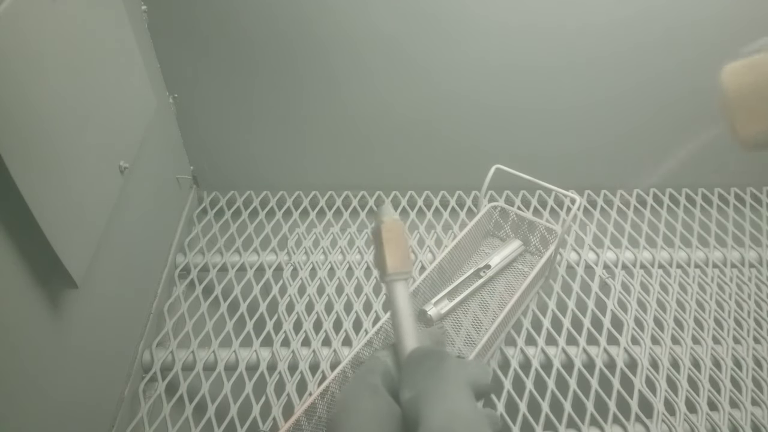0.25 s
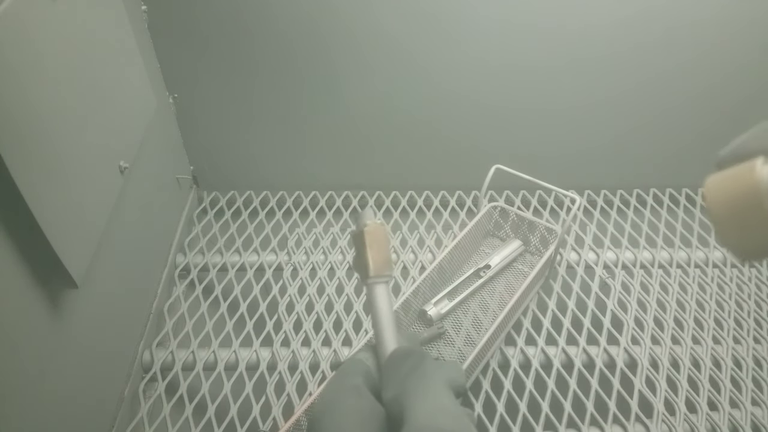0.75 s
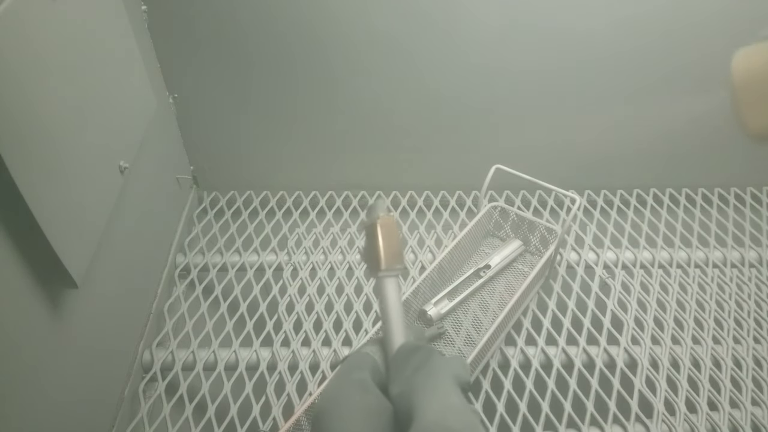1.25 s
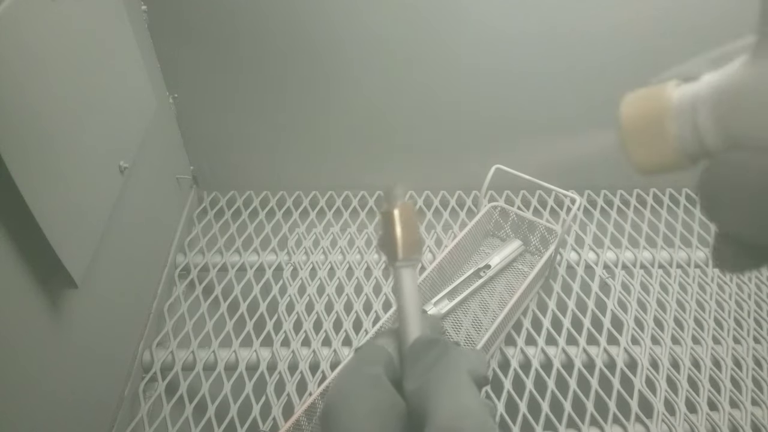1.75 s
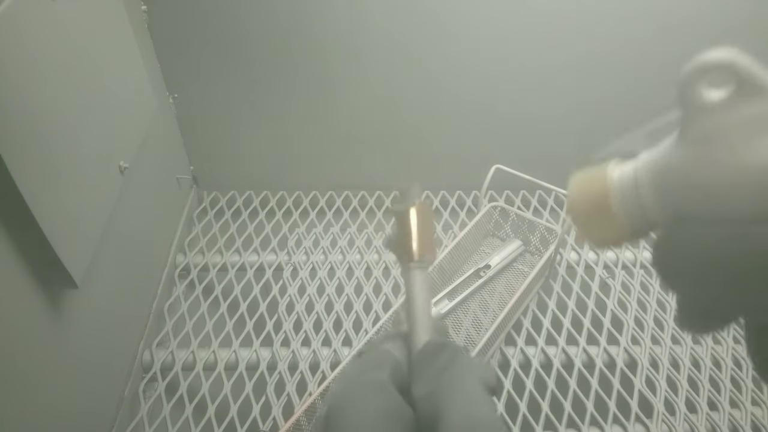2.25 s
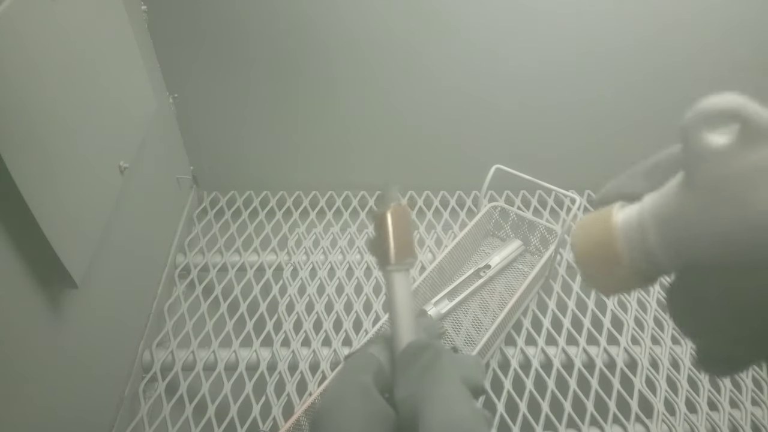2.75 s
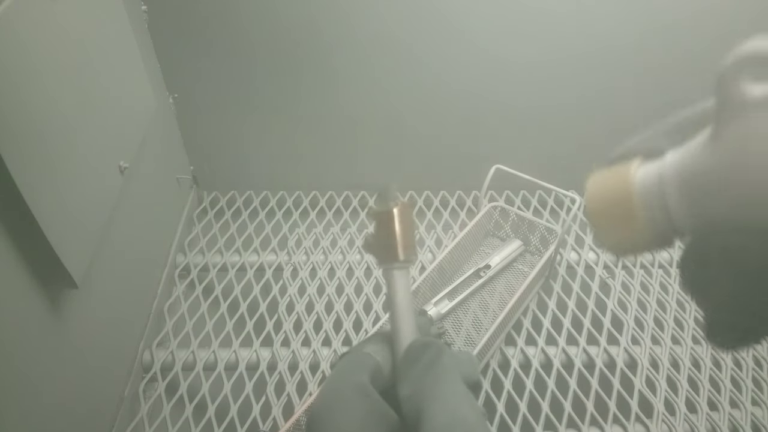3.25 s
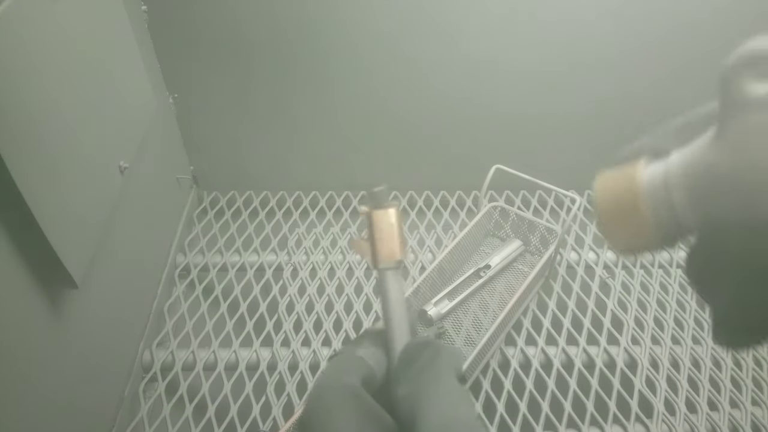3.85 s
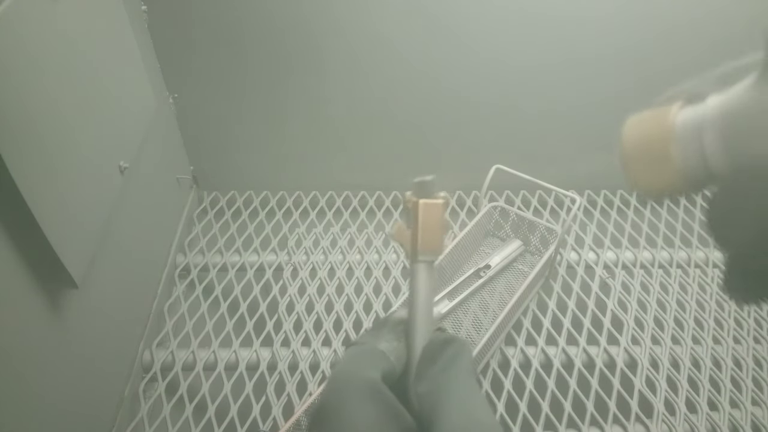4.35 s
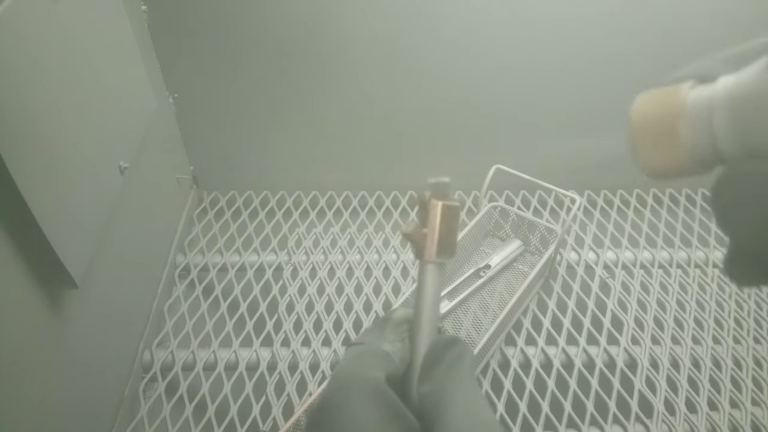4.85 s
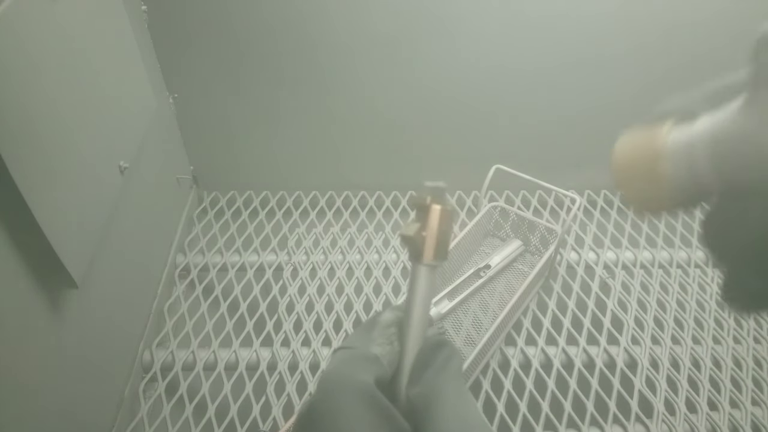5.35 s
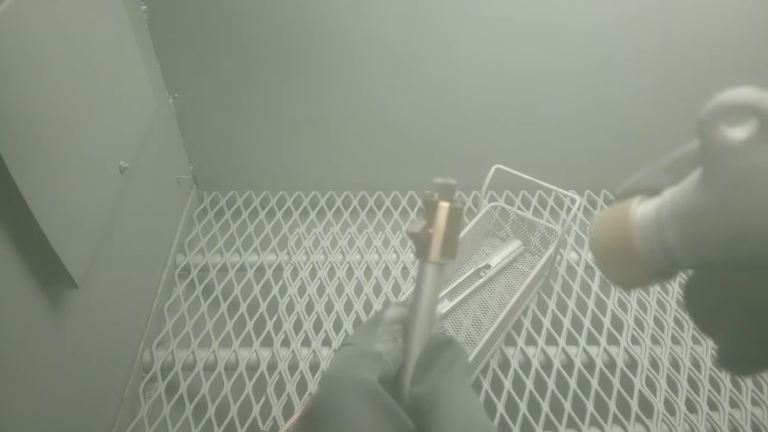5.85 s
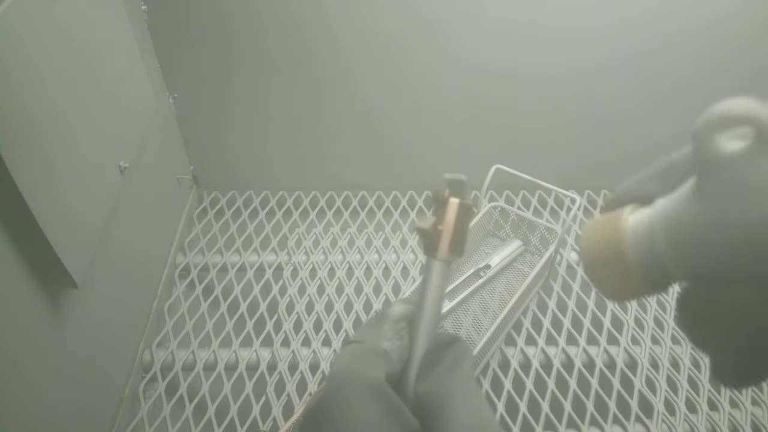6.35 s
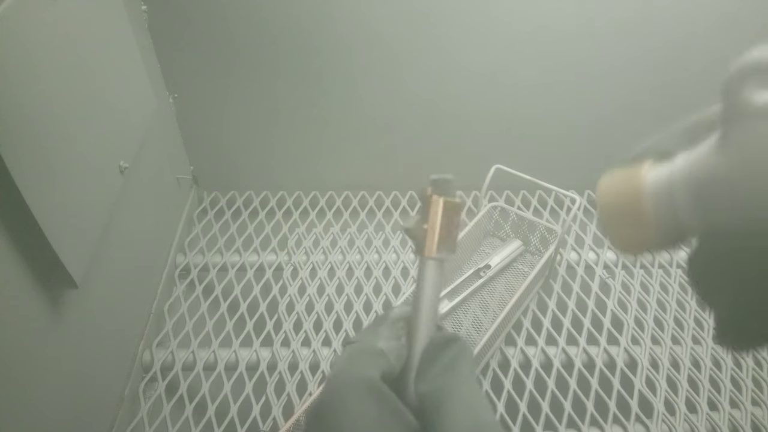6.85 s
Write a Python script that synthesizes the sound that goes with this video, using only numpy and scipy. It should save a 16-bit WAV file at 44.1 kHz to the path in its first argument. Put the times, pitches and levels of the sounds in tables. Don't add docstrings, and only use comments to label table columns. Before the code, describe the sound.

Inside a closed steel cabinet, a quiet motor hum gives way to a burst of air and a long gritty blasting hiss rattling on metal.

```python
import sys
import numpy as np
from scipy import signal
from scipy.fft import rfft, irfft, next_fast_len
from scipy.io import wavfile
from scipy.ndimage import uniform_filter1d, map_coordinates

SR = 44100
rng = np.random.default_rng(int(sys.argv[2]) if len(sys.argv) > 2 else 0)


def inscribe(sig):
    pcm = np.round(np.clip(np.atleast_2d(sig).T, -1, 1) * 32767)
    wavfile.write(sys.argv[1], SR, pcm.astype(np.int16))


def level_to_linear(level):
    exponent = np.asarray(level, float) / 20
    return 10 ** exponent


N = 313110
TIME_S = np.arange(N) / SR
HALF_SIDE = np.array([[.5], [-.5]])

# (middle [s], half length [s], grit level [dB],
# hand speed [re usual], brightness [dB])
PASSES = [(0.858, 0.12, -30, 0.8, -5.5), (1.166, 0.097, -38.5, 0.75, -2), (1.555, 0.053, -40, 1.2, -4),
          (1.742, 0.018, -36, 1.6, -2.5), (2.166, 0.049, -31, 0.27, 3), (2.42, 0.11, -39.5, 0.95, -1),
          (2.834, 0.086, -28, 0.81, -2.5), (3.31, 0.06, -31.5, 0.55, 1), (3.483, 0.04, -27.5, 0.85, -2),
          (4.096, 0.054, -26.5, 0.58, 0), (4.685, 0.095, -27, 0.76, 0), (5.103, 0.13, -34, 0.64, 1.5),
          (5.308, 0.035, -26, 1.4, 0), (5.42, 0.02, -32, 1.6, 0.5), (5.758, 0.069, -35, 1.6, 3.5),
          (5.97, 0.056, -32, 0.41, 2), (6.455, 0.02, -25.5, 1.1, 5), (6.638, 0.015, -31.5, 3.2, 4.5),
          (6.83, 0.033, -34, 0.68, 7), (7.025, 0.052, -29, 1.5, 3)]
# (time [s], level [dB])
BASS_CUT_DB = [(0, 1.5), (.75, 1), (1.0, -4), (1.35, -4), (1.6, -7.5), (1.8, -16), (1.95, -19.5),
               (2.3, -17), (2.85, -18), (3.5, -16), (7.1, -17.5)]


def gun():
    # (opens [s], jet rise [s], grit delay [s], grit rise [s])
    valve = (.711, .012, .022, .028)
    # (time [s], air jet level [dB], squareness to the part [dB])
    hand = [(.75, -20.5, 9.5), (.95, -18.5, 2.5), (1.3, -21.5, 5.5), (1.65, -26.5, -1), (1.97, -26, -4),
            (2.5, -25.5, -2), (3.2, -23.5, 1.5), (3.5, -24.5, 0.5), (3.74, -21.5, 0.5), (3.8, -24.5, -0.5),
            (4.2, -23, 2.5), (4.85, -24.5, 2.5), (5.5, -23.5, 1.5), (5.93, -25.5, 0.5), (6.11, -21.5, 4.5),
            (6.22, -24.5, 4), (6.45, -23.5, 0.5), (7.1, -26, 3.5)]
    # (time [s], left-right level [dB])
    side = [(0, 2), (.8, 2), (1.1, 0.8), (1.46, 2), (1.75, -0.5), (2.6, -0.4), (7.1, -0.5)]
    start_s, jet_rise_s, delay_s, grit_rise_s = valve
    hand_db, facing_db = curves(hand)
    side_db, = curves(side)
    grit_db = sweeps()
    surge = wobble(13)
    valve_open = opening(start_s, jet_rise_s) ** 2
    arrival = opening(start_s + delay_s, grit_rise_s) + 0.25 * valve_open
    spray_tail, puff, burst, creep = escapes()

    jet = air_jet(valve_open, hand_db, surge)
    leak = valve_leak(puff) + rush(burst + creep) + last_spray(spray_tail)
    ping = ricochet(arrival, facing_db, grit_db, surge)
    echo = cabinet(mono(ping + level_to_linear(1.5) * jet), t60_s=0.14, stays=0.1)
    air = (jet + leak + ping + level_to_linear(-5.0) * echo) * level_to_linear(side_db * HALF_SIDE)
    air = patchy(air, depth_db=2, size=1024, bins=3, frames=2)

    load = arrival * level_to_linear(grit_db + 0.27 * surge + 0.24 * wobble(25)) + slugs()
    load = load + level_to_linear(-9 + 41 * np.minimum(TIME_S, .3)) * spray_tail
    thrum = arrival * wall_drive(grit_db, surge)
    return air + boom(thrum) + part_ring() + struck_steel(load, thrum)


def air_jet(valve_open, hand_db, surge):
    # (time [s], level [dB], half length [s])
    hose = [(1.0, -1, .08), (1.55, 0.5, .06), (1.75, 2.5, 0.057), (2.25, -2.5, 0.027), (3.1, -1.5, .05),
            (3.41, 0.5, 0.072), (3.85, 0.5, 0.067), (4.4, -1, 0.03), (4.65, 0.5, .1), (4.95, -1, .08),
            (5.58, -1, 0.042), (6.48, -0.5, .05), (6.6, -0.5, .05), (6.8, -1, 0.056), (6.9, 2, .04)]
    # (frequency [Hz], density [dB per Hz])
    jet_colour = [(1470, -37), (2500, -15), (2660, -11.5), (2830, -13), (3220, -12), (4730, -7.5),
                  (6900, 0.5), (7920, 0), (8960, -8), (11500, -5), (13900, -5.5), (15000, -7), (15700, -35)]
    jet_db = hand_db + 2.5 + bumps(hose)
    flow = valve_open * level_to_linear(jet_db + 0.16 * surge + 0.49 * wobble(30))
    return flow * ports(hail(spiky_db=1.44, patchy_db=1.0), jet_colour[:-1], lag_s=0.000445)


def sweeps():
    on_db_per_s, off_db_per_s, miss_db = 75.5, 91, -52.5
    t = np.arange(0, N, 64) / SR
    mid_s, half_s, pass_db, speed, _ = np.transpose(PASSES)[:, :, None]
    before_db = on_db_per_s * np.clip(mid_s - half_s - t, 0, None)
    after_db = off_db_per_s * np.clip(t - mid_s - half_s, 0, None)
    power = np.sum(level_to_linear(pass_db - speed * (before_db + after_db)) ** 2, axis=0) + level_to_linear(miss_db) ** 2
    return np.interp(TIME_S, t, 10 * np.log10(power))


def slugs():
    # (time [s], peak level [dB])
    landings = [(0.8582, -27), (0.9505, -13), (1.4389, -21), (1.9298, -57), (2.4012, -28), (2.4466, -8.5),
                (2.548, -21), (2.6326, -18), (2.7045, -21.5), (3.1724, -28), (3.2722, -26.5), (3.3186, -16),
                (3.7751, -28), (3.8429, -24.5), (3.9611, -14), (4.038, -14), (4.4143, -34.5), (4.4465, -14),
                (4.5124, -15), (4.607, -10), (4.7129, -5), (4.9948, -17), (5.0761, -24.5), (5.6658, -33),
                (5.6952, -16), (5.7556, -27.5), (5.8229, -10), (5.9421, -19), (6.0334, -14), (6.1282, -16),
                (6.2614, -12), (6.3727, -27), (6.426, -17), (6.8401, -14), (7.0566, -17)]
    rise_s, t60_s = 0.0024, 0.17
    kicks, t = np.zeros(N), np.arange(SR // 4) / SR
    land_s, peak_db = np.transpose(landings)
    kicks[(land_s * SR).astype(int)] = level_to_linear(peak_db - 17.5)
    shape = (1 - np.exp(-t / rise_s)) * level_to_linear(-60 * t / t60_s)
    return np.abs(signal.fftconvolve(kicks, shape)[:N])


def struck_steel(load, thrum):
    # (frequency [Hz], density [dB per Hz])
    steel_colour = [(410, -40), (700, -8), (956, -6), (1010, -5), (1300, -1.5), (1600, 2), (1900, -1),
                    (2780, -1), (3190, 1.5), (4500, -9.5), (5850, 0), (9900, -120)]
    # (frequency [Hz], width [Hz], level [dB], left-right likeness [-1..1])
    panel_modes = [(900, 12, -7, .3), (1032, 10, -1, -.2), (1140, 12, 0, -.3), (1355, 16, -2, -.4),
                   (1543, 12, -3, -.3), (1571, 14, -2, .5), (1666, 14, 2, -.3), (2000, 20, -6, 0),
                   (2266, 25, -3, .4), (2499, 18, -1, .4), (2957, 20, -5, .3), (3247, 18, -1, .3),
                   (3619, 22, -2, 0)]
    # (frequency [Hz], width [Hz], level [dB], likeness [-1..1])
    box_modes = [(239, 10, -3, .95), (262, 14, -6, .95), (348, 10, 0, .85), (416, 12, -1, .7),
                 (485, 12, -3, .7), (509, 12, -4, .6), (615, 14, -6, .4), (717, 14, 0, .3),
                 (813, 14, -7, .3), (852, 12, -7, .3)]
    rattle = load * ports(hail(spiky_db=2, patchy_db=2.0), steel_colour, lag_s=0.00049)
    plates = patchy(ringing(load, panel_modes), depth_db=3.5, size=2048, bins=2, frames=7)
    ring = level_to_linear(-5.5) * plates + level_to_linear(-4.0) * ringing(thrum, box_modes)
    echo = cabinet(mono(rattle), t60_s=0.21, stays=0.42)
    return tilted(rattle + ring + level_to_linear(-5.0) * echo)


def ringing(level, modes):
    m = next_fast_len(N + 8192)
    low_bins = m // 6
    drive = rfft(level * rng.standard_normal((2, N)), m)[:, :low_bins]
    f = np.arange(low_bins) * SR / m
    out = np.zeros_like(drive)
    for k, (hz, width_hz, mode_db, alike) in enumerate(modes):
        damping = 1j * f * width_hz
        mode = (-1) ** k * level_to_linear(mode_db) * damping / (hz * hz - f * f + damping)
        turn = np.arccos(alike) / 2
        mid = np.cos(turn) * drive[0]
        side = np.sin(turn) * np.outer([1, -1], drive[1])
        out += mode * (mid + side)
    return unit(irfft(out, m)[:, :N]) * np.sqrt(np.mean(level ** 2))


def tilted(x):
    mid_s, *_, bright_db = np.transpose(PASSES)
    tilt_db = np.interp(TIME_S, mid_s, bright_db) / 2
    low = filtered(x, lambda hz: 1 / (1 + (hz / 1970) ** 4))
    return low * level_to_linear(-tilt_db) + (x - low) * level_to_linear(tilt_db)


def wall_drive(grit_db, surge):
    # (time [s], level [dB])
    wall = [(.75, -1), (1.0, -1.5), (1.45, 0), (2.1, 0), (2.6, 0), (3.5, -0.5), (4.1, -1.5), (5.0, -1),
            (5.6, 0), (6.3, 2.5), (6.8, -2), (7.1, 0)]
    cut_db, = curves(BASS_CUT_DB)
    wall_db, = curves(wall)
    boom_db = -33 + 0.83 * (grit_db + 32) + 0.34 * cut_db + wall_db
    return level_to_linear(boom_db + 0.6 * surge)


def boom(thrum):
    # (frequency [Hz], density [dB per Hz])
    boom_colour = [(110, -54), (180, -11.5), (349, -4), (382, -10.5), (494, -1.5), (766, -6), (1300, -11),
                   (1690, -58), (2860, -120)]
    hits = hail(spiky_db=2.0, patchy_db=1.5)
    return thrum * level_to_linear(-4.5) * ports(hits, boom_colour, lag_s=0.00029)


def ricochet(arrival, facing_db, grit_db, surge):
    # (frequency [Hz], density [dB per Hz])
    ping_colour = [(1800, -35.5), (2600, -15), (3300, -2), (4300, -0.5), (5500, 0.5), (7000, -14)]
    ping_db = -32.5 + facing_db + 0.25 * (grit_db + 32) + 0.36 * surge
    hits = hail(spiky_db=2.5, patchy_db=-2.0)
    return arrival * level_to_linear(ping_db) * ports(hits, ping_colour, lag_s=0.000549)


def escapes():
    # (time [s], level [dB], rise [s], t60 [s])
    puffs = [
        (0.0014, -32.5, 0.00047, 0.29),
        (.61, -40, 0.003, 0.2),
        (0.71, -11, 0.015, 0.31),
        (0.696, -36, .015, .9),
    ]
    return [opening(s, rise_s) * level_to_linear(puff_db - 60 * np.abs(TIME_S - s) / t60_s)
            for s, puff_db, rise_s, t60_s in puffs]


def valve_leak(puff):
    # (frequency [Hz], width [Hz], level [dB])
    whistles = [(4630, 180, 4), (5600, 410, -4), (7000, 160, 3), (10240, 250, -1), (12800, 200, -4),
                (14700, 250, -11)]
    # (frequency [Hz], density [dB per Hz])
    leak_colour = [(2500, 2), (4000, -6), (4600, 0.5), (5600, -6), (7100, -2), (9000, -10), (10500, -3),
                   (11800, -9), (13000, -8), (15500, -13)]

    def seat(f):
        return sum(level_to_linear(peak_db) * width_hz * f / np.hypot(hz * hz - f * f, f * width_hz)
                   for hz, width_hz, peak_db in whistles)

    whistle = level_to_linear(3.5) * unit(filtered(rng.standard_normal((2, N)), seat))
    return puff * (whistle + ports(rng.standard_normal((2, N)), leak_colour, lag_s=0.00047))


def rush(level):
    # (frequency [Hz], density [dB per Hz])
    rush_colour = [(2500, -20.5), (4500, -6), (7000, -10), (9000, -6), (11000, -2.5), (12500, -4),
                   (13800, -8), (15500, -13)]
    return level * ports(rng.standard_normal((2, N)), rush_colour, lag_s=0.00052)


def last_spray(level):
    # (frequency [Hz], density [dB per Hz])
    fading_colour = [(290, -39), (500, -7), (1310, -6), (1900, -17), (2400, -28), (2930, -8), (3530, -15),
                     (7000, -12), (11000, -20), (15500, -24)]
    return level * level_to_linear(1.0) * ports(rng.standard_normal((2, N)), fading_colour, lag_s=0.00051)


def part_ring():
    # (frequency [Hz], level [dB], t60 [s])
    part_modes = [(2800, -41, .1), (2850, -36, .1), (2960, -37, 0.09), (3070, -32, 0.09)]
    return sum(level_to_linear(mode_db + 3 * wobble(37) - 60 * TIME_S / t60_s) * np.sin(2 * np.pi * hz * TIME_S)
               for hz, mode_db, t60_s in part_modes)


def cabinet(x, t60_s, stays):
    t = np.arange(SR // 6) / SR
    hop = int(.35 * SR)

    def tail():
        decay = level_to_linear(-60 * t / t60_s) * np.sqrt(6 * np.log(10) / t60_s / SR)
        return rng.standard_normal((2, len(t))) * decay

    padded = np.pad(x, ((0, 0), (hop, 2 * hop)))
    fade = np.sin(np.pi * np.arange(2 * hop) / (2 * hop))
    roaming = np.zeros((2, N + 3 * hop + len(t)))
    for s in range(0, N + hop, hop):
        piece = padded[:, s:s + 2 * hop] * fade
        roaming[:, s:s + 2 * hop + len(t) - 1] += signal.fftconvolve(piece, tail(), axes=1)
    kept = signal.fftconvolve(x, tail(), axes=1)[:, :N]
    return np.sqrt(stays) * kept + np.sqrt(1 - stays) * roaming[:, hop:hop + N]


def extractor():
    # (frequency [Hz], level [dB])
    motor_lines = [(59.2, -47.5), (118.4, -52.5), (242.2, -49), (301.5, -52), (416.5, -46.5),
                   (468.3, -76.5)]
    # (time [s], level [dB], half length [s])
    gusts = [
        (.95, 7.5, 0.33),
        (2.72, 2, 0.092),
        (3.68, 9, 0.28),
        (5.332, 5, 0.066),
        (6.47, -3, 0.091),
    ]
    # (frequency [Hz], density [dB per Hz])
    rumble_colour = [(20, -30), (40, -16), (75, -8.5), (95, -10), (140, -4), (200, 0.5), (450, -4.5),
                     (700, -11), (1500, -29.5)]
    # (frequency [Hz], density [dB per Hz])
    draught_colour = [(300, -34), (600, -4.5), (900, -2), (1400, -4), (2400, -9.5), (3800, -5.5),
                      (5500, -14), (8000, -10.5), (9000, -32), (15700, -23)]
    cut_db, = curves(BASS_CUT_DB)
    skew_rad = np.array([[.19], [-.19]])
    lines = 0
    for hz, line_db in motor_lines:
        level = level_to_linear(line_db - motor_lines[0][1] + hz / 220 * (wobble(22) - 5.0))
        phase = 2 * np.pi * hz * TIME_S + hz / 650 * wobble(37) + skew_rad
        lines = lines + level * np.sin(phase)
    rumble_db = -43 + 0.53 * cut_db + bumps(gusts)
    rumble = level_to_linear(rumble_db) * ports(rng.standard_normal((2, N)), rumble_colour, lag_s=0.00032)
    draught = level_to_linear(-47.5) * ports(rng.standard_normal((2, N)), draught_colour, lag_s=0.00041)
    return level_to_linear(-41 + cut_db) * lines + rumble + draught


def hail(spiky_db, patchy_db):
    hits = rng.standard_normal((2, N)) * level_to_linear(spiky_db * rng.exponential(size=N))
    return patchy(hits, patchy_db, size=512, bins=6, frames=10)


def patchy(x, depth_db, size, bins, frames):
    z = signal.stft(x, nperseg=size)[2]
    field = uniform_filter1d(rng.standard_normal(z.shape[1:]), size=bins, axis=0)
    field = uniform_filter1d(field, size=frames, axis=1)
    return signal.istft(z * level_to_linear(depth_db * unit(field)), nperseg=size)[1][:, :N]


def ports(pair, spectrum, lag_s):
    # (frequency [Hz], likeness [0..1])
    likeness = [(60, 1), (250, 0.86), (500, 0.51), (1000, 0.33), (1550, 0.56), (1900, 0.1), (2250, 0.54),
                (2700, 0.13), (4200, 0.28), (4800, 0.69), (5600, 0.63), (6200, 0.22), (6900, 0.42),
                (7600, 0.23), (15000, 0.3)]
    m = next_fast_len(N + 8192)
    hz = np.fft.rfftfreq(m, 1 / SR)
    turn = np.arccos(np.clip(along(likeness, hz), -1, 1)) / 2
    mid, side = rfft(pair, m) * level_to_linear(along(spectrum, hz)) * [np.cos(turn), np.sin(turn)]
    late = np.exp(-1j * np.pi * hz * lag_s)
    return unit(irfft(np.array([(mid + side) * late, (mid - side) / late]), m)[:, :N])


def mono(x):
    return x.mean(axis=0, keepdims=True)


def unit(x):
    return x / np.sqrt(np.mean(x ** 2) + 1e-20)


def along(points, hz):
    f, v = np.transpose(points)
    return np.interp(np.log(hz + 1), np.log(f + 1), v)


def curves(rows):
    s, *cols = np.transpose(rows)
    return [np.interp(TIME_S, s, c) for c in cols]


def bumps(rows):
    return sum(swell_db * np.exp(-((TIME_S - s) / half_s) ** 2) for s, swell_db, half_s in rows)


def wobble(rate):
    coarse = np.arange(0, N + 32, 32)
    knots = rng.standard_normal(int(N * 60 / SR))
    curve = map_coordinates(knots, [coarse * min(rate, 50) / SR])
    return np.interp(np.arange(N), coarse, curve)


def opening(start_s, rise_s):
    return 1 - np.exp(-np.clip(TIME_S - start_s, 0, None) / rise_s)


def filtered(x, response):
    m = next_fast_len(N + 8192)
    return irfft(rfft(x, m) * response(np.fft.rfftfreq(m, 1 / SR)), m)[..., :N]


def scene():
    return gun() + extractor()


def band_limit(x):
    return signal.sosfilt(signal.butter(12, 15700, fs=SR, output="sos"), x)


def record(dry):
    # (frequency [Hz], left-right level [dB])
    balance = [(60, -0.5), (180, 0), (550, -1), (1650, 0.5), (4970, 0), (15000, 2)]
    x = filtered(dry, lambda hz: level_to_linear(along(balance, hz) * HALF_SIDE) * (hz < 15690))
    x = x / (1 + np.abs(x / .9) ** 4) ** (1 / 4)
    return band_limit(x)


dry = scene()
out = record(dry)
inscribe(out)
```